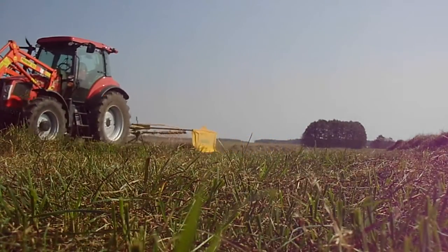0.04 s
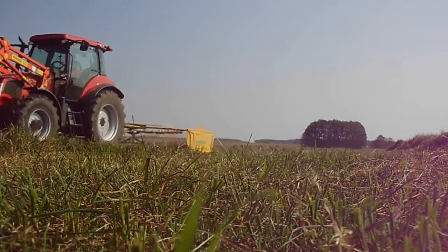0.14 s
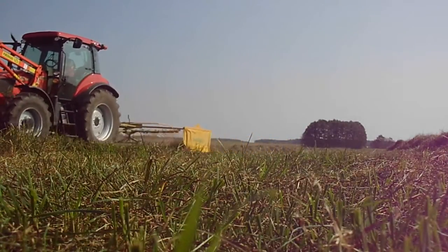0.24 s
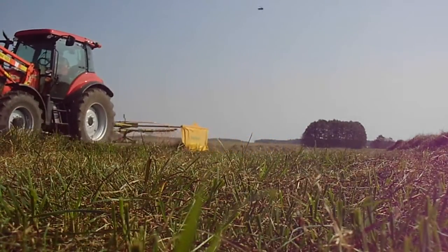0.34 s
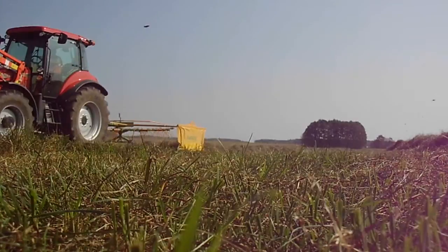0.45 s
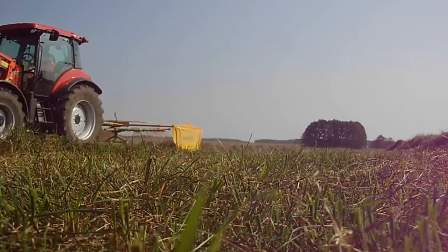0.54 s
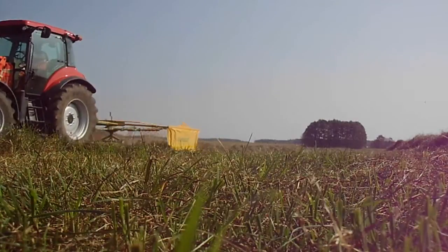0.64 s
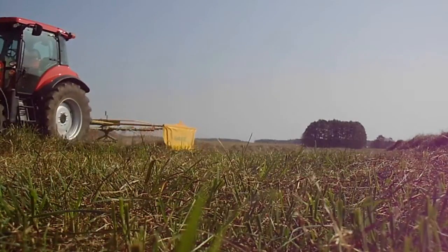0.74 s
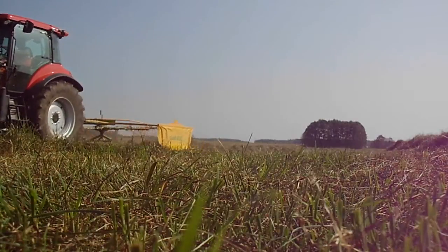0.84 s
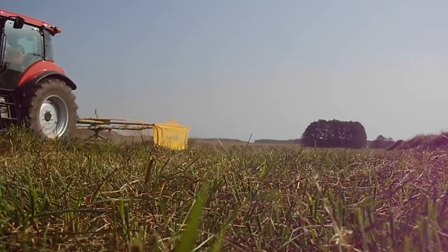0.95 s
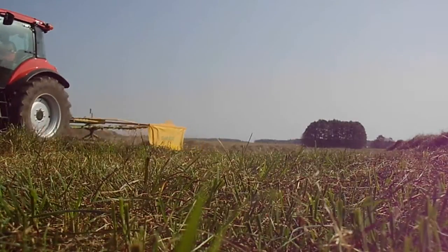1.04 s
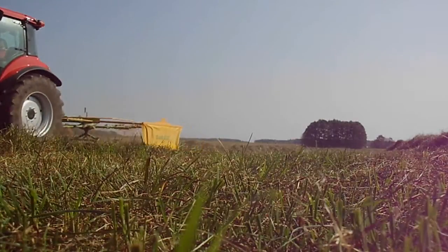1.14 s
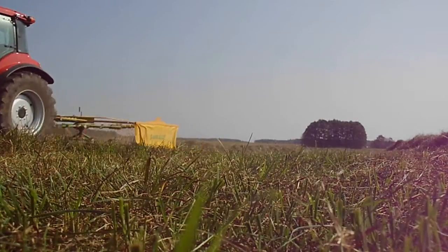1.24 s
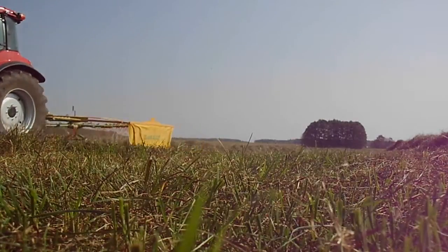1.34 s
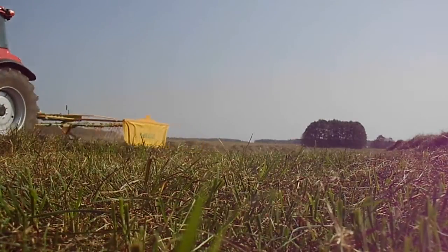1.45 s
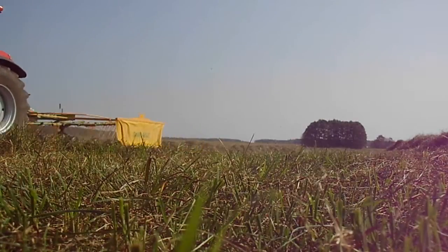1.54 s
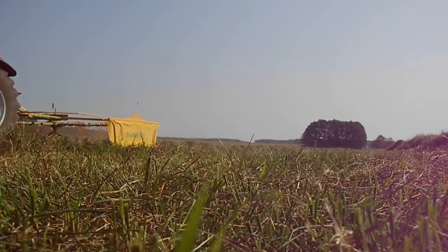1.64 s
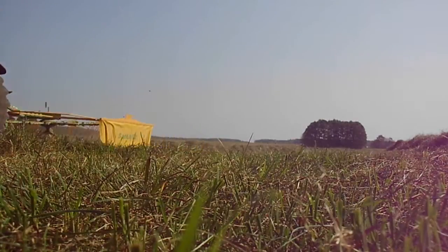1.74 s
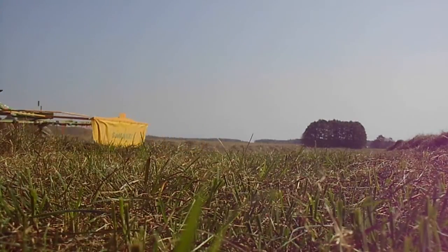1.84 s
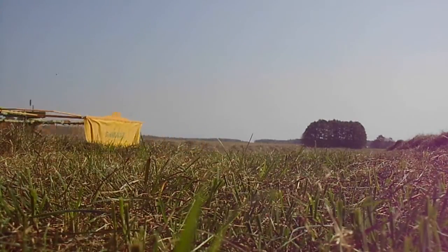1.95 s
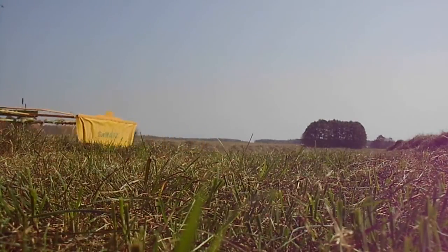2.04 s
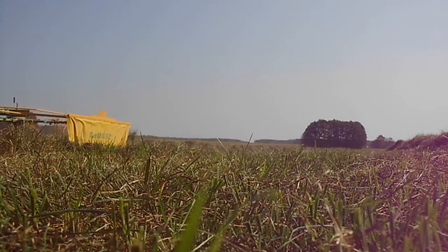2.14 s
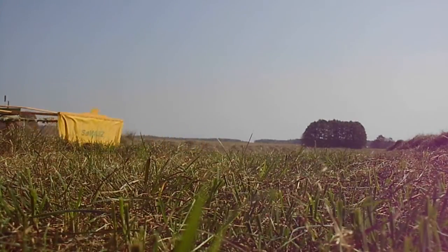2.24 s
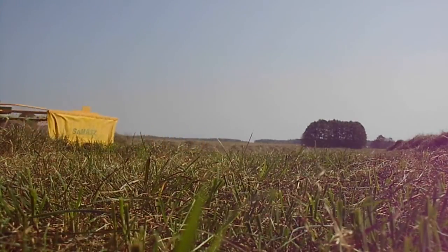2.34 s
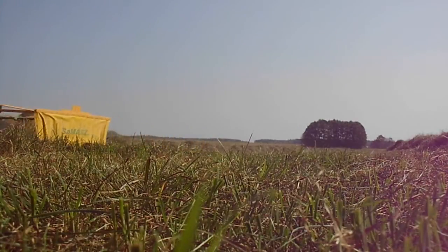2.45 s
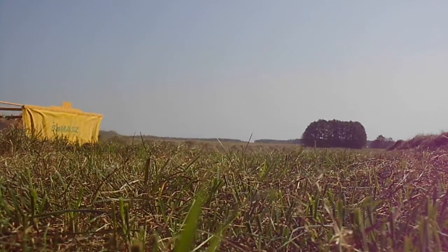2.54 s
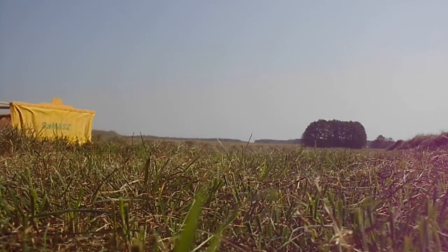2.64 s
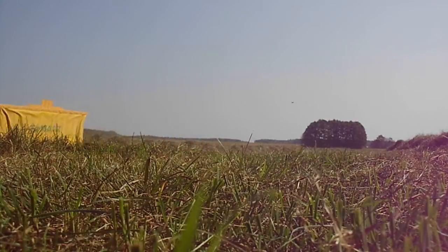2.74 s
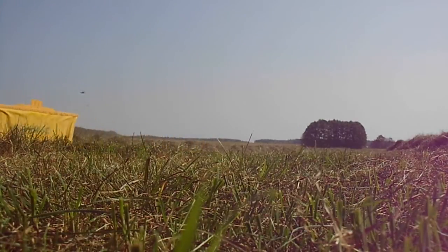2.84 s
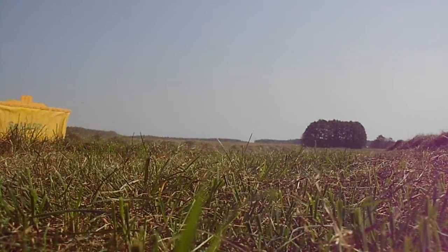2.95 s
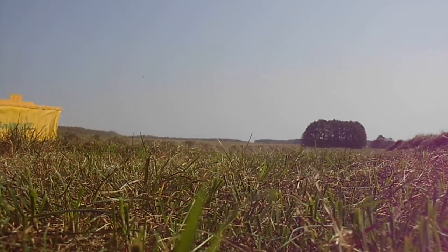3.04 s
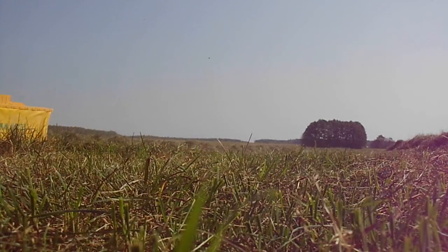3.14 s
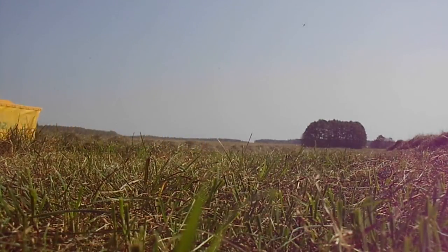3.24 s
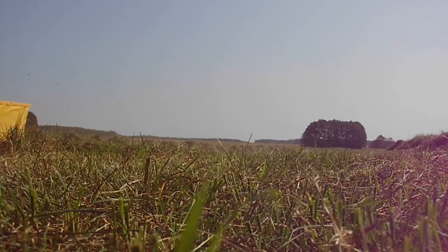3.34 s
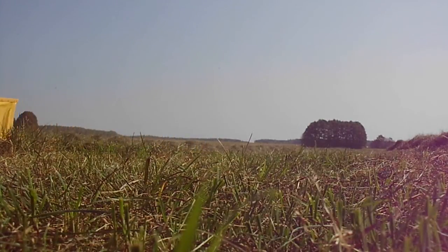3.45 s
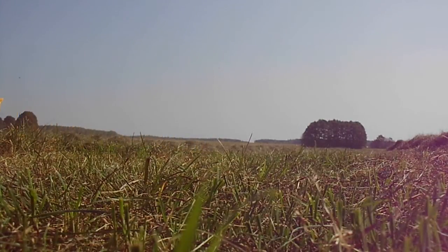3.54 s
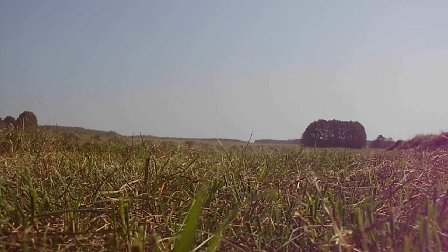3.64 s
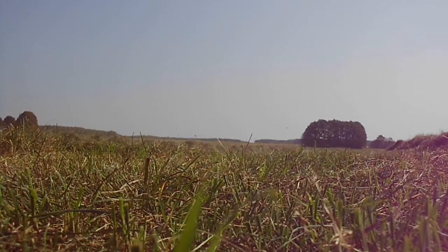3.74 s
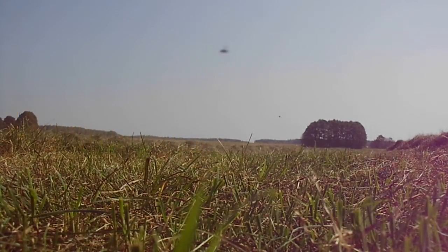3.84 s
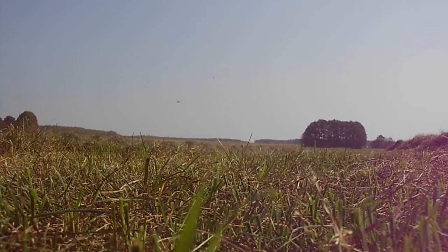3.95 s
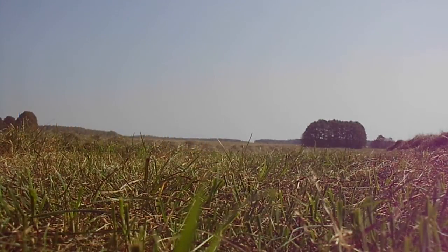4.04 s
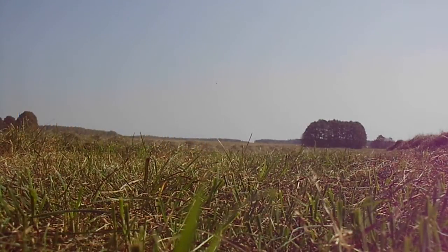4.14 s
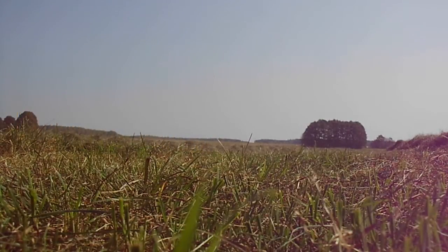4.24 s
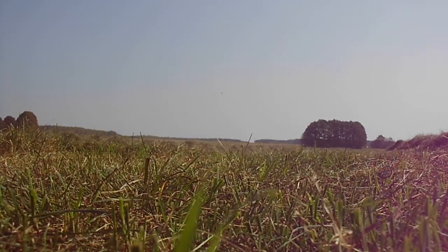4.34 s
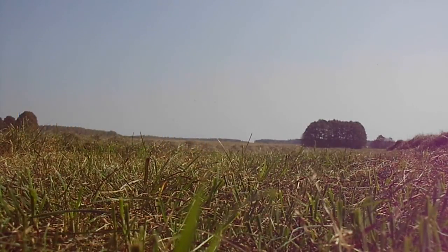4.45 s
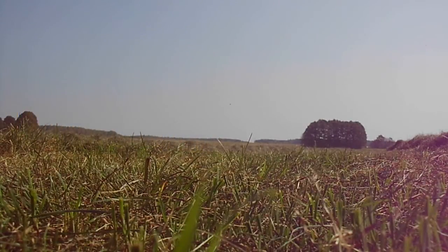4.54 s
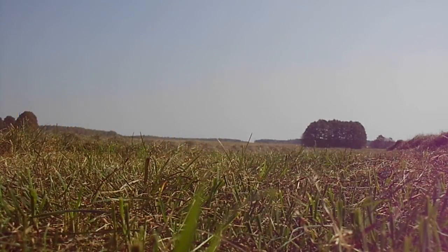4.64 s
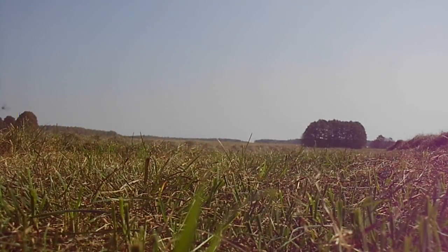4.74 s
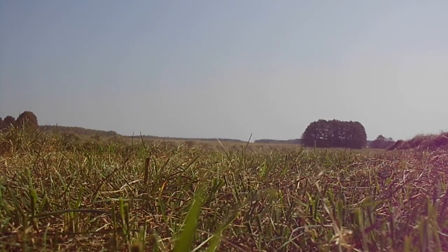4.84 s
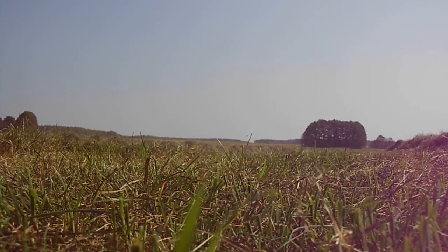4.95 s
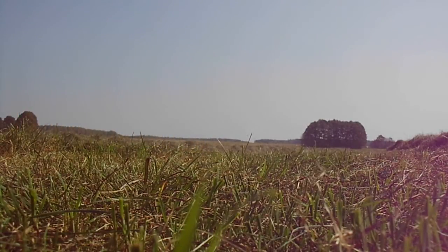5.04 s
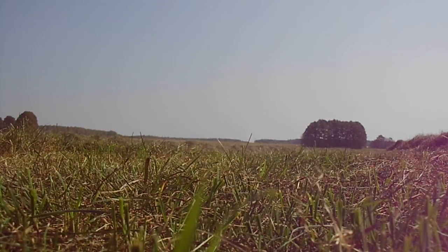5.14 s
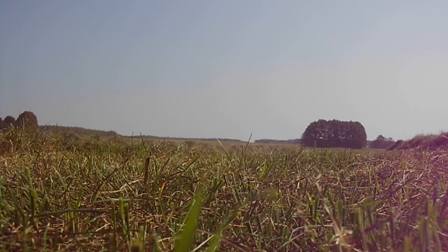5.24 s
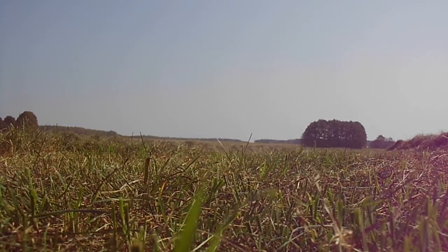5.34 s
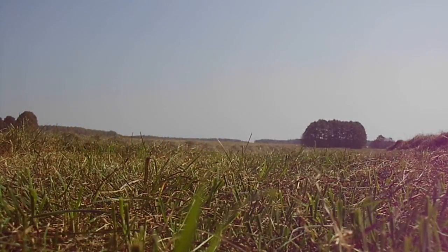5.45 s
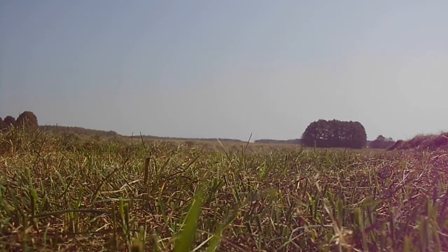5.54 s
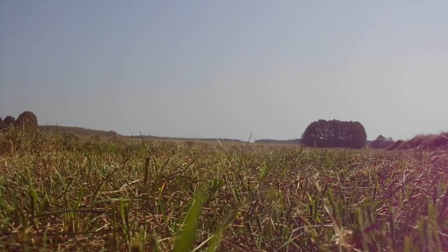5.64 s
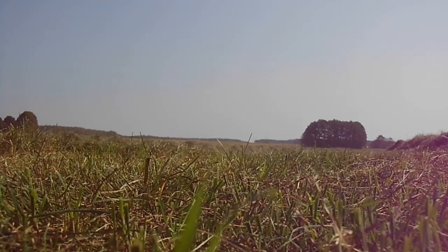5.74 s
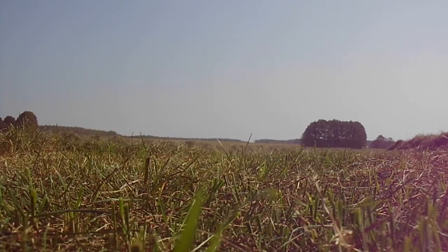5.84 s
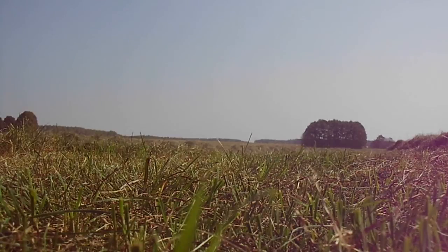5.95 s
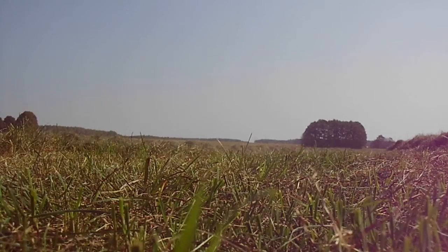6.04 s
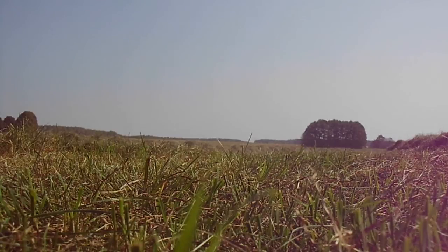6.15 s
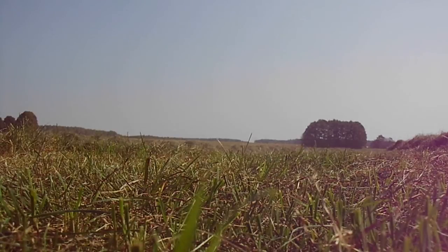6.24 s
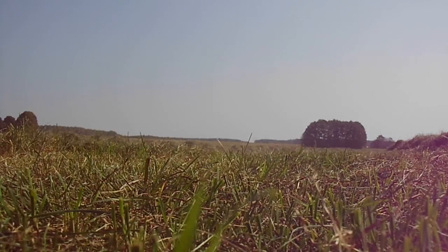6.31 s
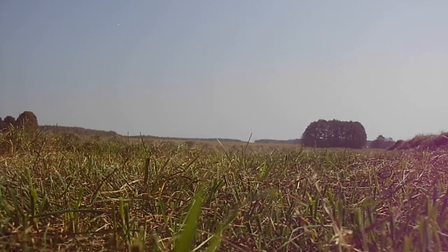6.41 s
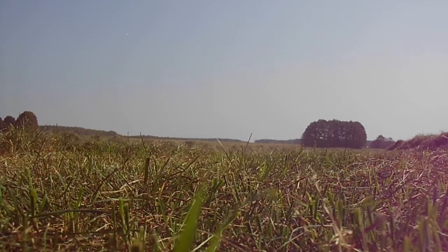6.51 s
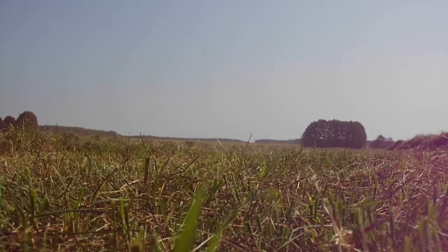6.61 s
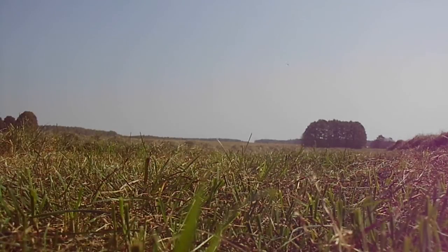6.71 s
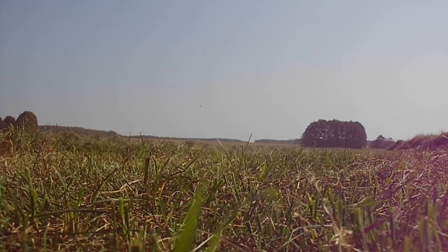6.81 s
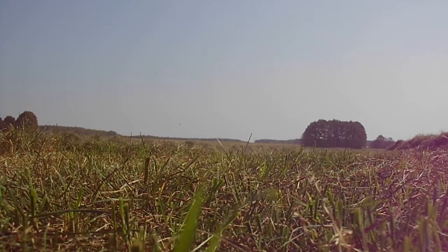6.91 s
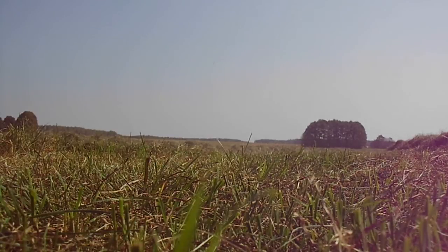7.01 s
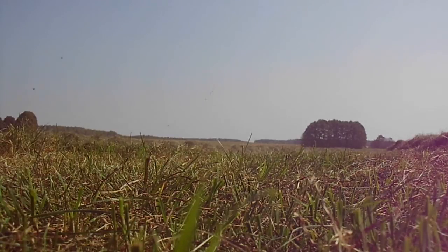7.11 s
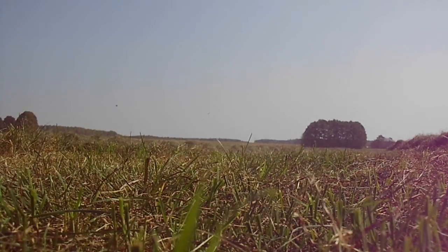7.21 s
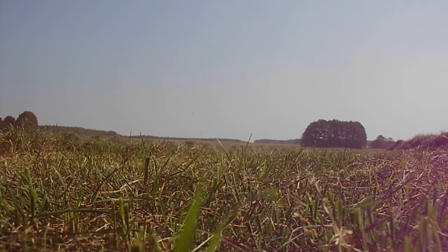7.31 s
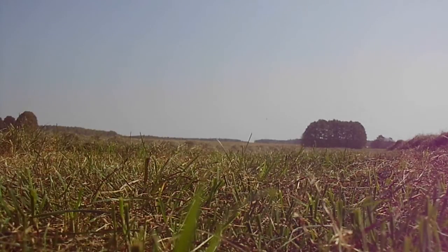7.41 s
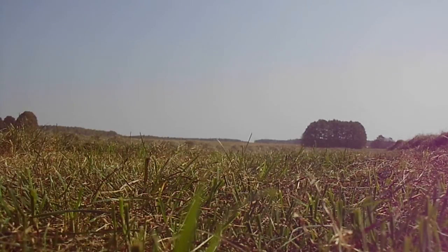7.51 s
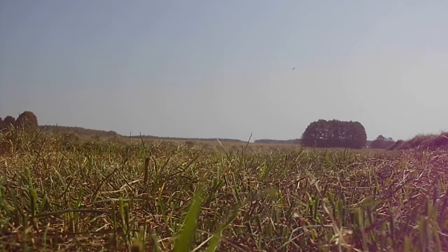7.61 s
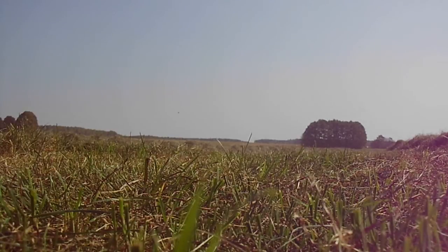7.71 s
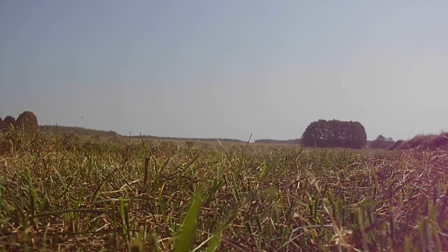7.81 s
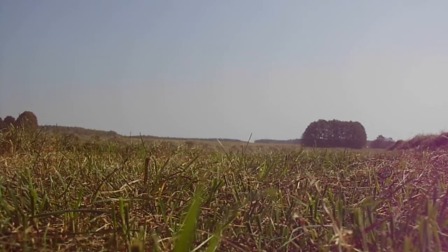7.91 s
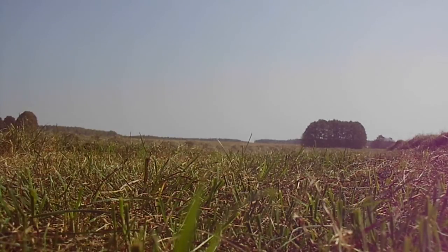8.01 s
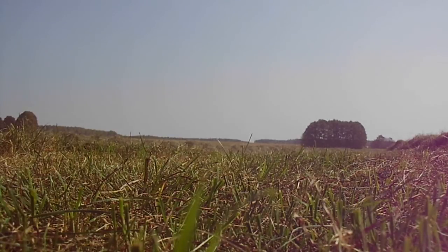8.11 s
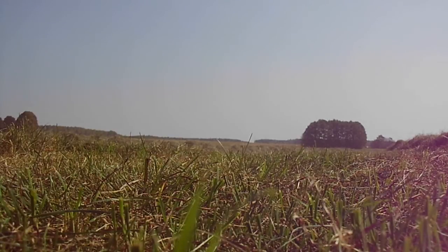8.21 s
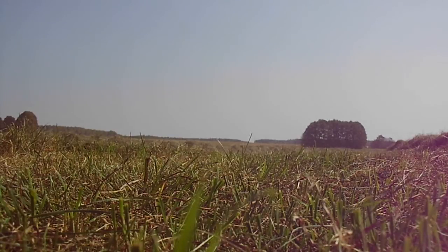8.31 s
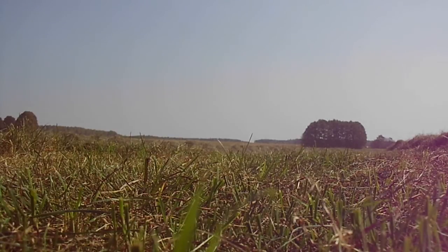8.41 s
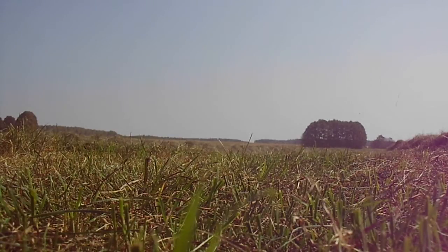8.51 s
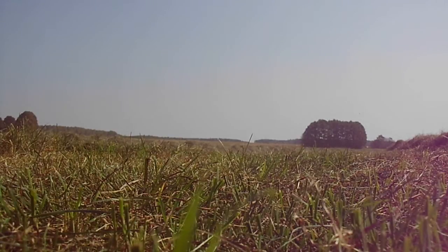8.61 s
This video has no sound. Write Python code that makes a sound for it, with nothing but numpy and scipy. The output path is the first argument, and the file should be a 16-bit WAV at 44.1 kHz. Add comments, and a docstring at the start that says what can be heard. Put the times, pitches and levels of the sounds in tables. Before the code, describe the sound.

A tractor's throbbing, whining engine passes and recedes across a field, its trailing rake combing dry hay, clanking and squeaking.

```python
"""A diesel tractor tows a rotary hay rake past a listener low in the stubble, then draws away.
First the engine: the exhaust throbs, gears whine in step with it and injectors tick, while steel
tines comb the hay. The exhaust booms as the rig turns its back; then loose rake arms clank, dry
joints squeak and the exhaust booms again. Far off, the soft ground notches the fading sound.
Little is heard above 6 kHz, and overload flattens the loudest peaks."""
import sys
import numpy as np
from scipy import signal
from scipy.fft import rfft, irfft
from scipy.io import wavfile

SR = 44100
rng = np.random.default_rng(int(sys.argv[2]) if len(sys.argv) > 2 else 0)


def generate_wav(signal):
    """Clip the signal to [-1, 1] and save it as 16-bit WAV at the path in sys.argv[1]."""
    frames = np.transpose(np.atleast_2d(signal))
    scaled = np.clip(frames, -1, 1) * 32767
    pcm = np.round(scaled).astype(np.int16)
    wavfile.write(sys.argv[1], SR, pcm)


N = 382347
TIME = np.arange(N) / SR
FREQ = np.maximum(np.fft.rfftfreq(N, 1 / SR), 1)
BAND_HZ = 5600  # upper edge of the input's band
# ring of the spring tines and their arms: pitch_hz, width_hz, level_db
TINE_MODES = [(2862, 43, -2), (3170, 53, -6), (3553, 23, -4.5), (4630, 73, 1), (4850, 61, 0)]


def undb(db):
    """Decibels to gain."""
    return 10 ** (np.asarray(db) / 20)


def unit(x):
    """Scale to rms 1."""
    return x / np.sqrt(np.mean(x ** 2))


def automation(points):
    """Join (time_s, value) points into a value per sample."""
    return np.interp(TIME, *np.transpose(points))


def equalise(x, points):
    """Filter by a curve of (frequency_hz, gain_db) points."""
    hz, db = np.transpose(points)
    return irfft(rfft(x) * undb(np.interp(np.log(FREQ), np.log(hz), db)), N)


def colour(x, points):
    """Give a spectrum to x; rms 1."""
    return unit(equalise(x, points))


def ring(x, modes):
    """Drive damped resonances (pitch_hz, width_hz, level_db); rms 1."""
    response = sum(undb(db) / (1 + 1j * (FREQ ** 2 - hz ** 2) / (FREQ * width))
                   for hz, width, db in modes)
    return unit(irfft(rfft(x) * response, N))


def noise():
    """White noise."""
    return rng.standard_normal(N)


def drift(rate_hz):
    """Smooth random wander up to about rate_hz; rms 1."""
    return unit(irfft(rfft(noise()) * np.exp(-(FREQ / rate_hz) ** 2), N))


def pass_by(peak_s, level_db, half_width_s, loss_db_per_s):
    """Gain of a part driving by at steady speed: 1 / distance, and the stubble absorbs on the way."""
    distance = np.hypot(TIME - peak_s, half_width_s)
    return half_width_s / distance * undb(level_db - loss_db_per_s * (distance - half_width_s))


def fader(part):
    """Swell and fade of a named part as it goes by."""
    # each part's pass: peak_s, level_db, half_width_s, loss_db_per_s
    passes = { "throb": (2.5, -21, 3, 1.2), "pipe": (3.5, -20.5, 2.5, 2.8), "hum": (4, -19, 0.33, -1),
              "rumble": (2.5, -14.3, 4, 1.25), "tractor roar": (1.8, -18.5, 2, 1.0),
              "rake roar": (4, -17.5, 1.16, 1.64), "injectors": (0.68, -20.4, 2, 4),
              "hay ahead": (2.0, -21, 0.73, 1.5), "hay behind": (4.0, -22, 1.33, 2),
              "bonnet": (1.24, -21, .17, -0.5), "drive line": (2.5, -32.5, 0.9, 0),
              "fine gear": (1.2, -38, 1.8, 1), }
    return pass_by(*passes[part])


def exhaust(firings):
    """The lowest multiples of the firing rate waver with the load; gas rings pipe and silencer."""
    # two swells of the third harmonic: peak_s, level_db, half_width_s, loss_db_per_s
    booms = [(2.83, -14, 0.32, .8), (4.95, -18, 0.47, -0.3)]
    angle = 2 * np.pi * firings
    throb = fader("throb") * undb(0.24 * drift(4)) * np.sin(angle)
    octave = fader("throb") * undb(-4.5 + 2.4 * drift(15)) * np.sin(2 * angle + 0.15 * drift(6.2))
    swell = np.linalg.norm([pass_by(*row) for row in booms], axis=0)
    boom = swell * undb(0.55 * drift(6)) * np.sin(3 * angle + 0.16 * drift(5.9))
    pipe = fader("pipe") * ring(noise(), [(145.3, 15, 0)])
    hum = fader("hum") * ring(noise(), [(300.4, 7, 0)])
    return np.sqrt(2) * (throb + octave + boom) + pipe + hum


def whine(cycles, flutter_db, flutter_hz, wobble_rad):
    """A vibrating part sings, fluttering in level and phase with its load."""
    flutter = undb(flutter_db * np.tanh(drift(flutter_hz)))
    return unit(flutter * np.sin(2 * np.pi * cycles + wobble_rad * drift(25)))


def gears_and_bonnet(firings):
    """Gear mesh, bonnet, drive line and a fine-toothed gear all sing in step with the engine."""
    # gear whine, strongest while the tractor's front faces the listener: time_s, level_db
    mesh_levels = [(0, -16.5), (.7, -18), (1.2, -22.5), (1.62, -18), (1.85, -26), (2.2, -20.5), (2.42, -26),
                   (3.05, -18), (3.7, -29.5), (4.6, -20), (5, -30.5), (5.4, -27), (6.5, -32.5),
                   (8.67, -44.5)]
    mesh_order, bonnet_order, drive_order, fine_order = 7.93, 5, 54.15, 68  # cycles per firing
    mesh = whine(mesh_order * firings, flutter_db=1.5, flutter_hz=17, wobble_rad=0.17)
    octave = whine(2 * mesh_order * firings, flutter_db=3, flutter_hz=7.4, wobble_rad=0.4)
    bonnet = whine(bonnet_order * firings, flutter_db=0.5, flutter_hz=15, wobble_rad=0.16)
    drive = whine(drive_order * firings, flutter_db=7, flutter_hz=10, wobble_rad=0.75)
    fine = whine(fine_order * firings, flutter_db=8, flutter_hz=9, wobble_rad=1.05)
    gear = undb(automation(mesh_levels)) * (mesh + undb(-19) * octave)
    return gear + fader("bonnet") * bonnet + fader("drive line") * drive + fader("fine gear") * fine


def firing_noise(firings, depth, decay_cycles, scatter_db):
    """Steady noise that surges at each firing, each surge with its own strength."""
    hiss = noise()
    strength = undb(scatter_db * rng.standard_normal(1000))[firings.astype(int)]
    return hiss * (1 + depth * strength * np.exp(-(firings % 1) / decay_cycles))


def rumble_and_roar(firings):
    """Gas puffs rumble and panels drone; fan, tyres and gears roar, the tractor's, then the rake's."""
    # colours of the low rumble and the midrange roar: frequency_hz, gain_db
    rumble_eq = [(15, -18), (40, -16.5), (70, -7.5), (110, -3.5), (140, -2), (180, -0.5), (250, -1),
                 (380, -1.5), (470, -11.5), (700, -29.5)]
    roar_eq = [(280, -31.5), (400, -3.5), (480, -1.5), (640, -2.5), (720, -4), (990, -7), (1130, -13),
               (1300, -19.5), (1500, -21.5), (2500, -32.5)]
    # resonances of silencer and panels, and faint transmission tones: pitch_hz, width_hz, level_db
    panel_modes = [(167, 6.6, -1.5), (207.2, 5.8, 1), (364, 14, -4)]
    transmission_modes = [(649.2, 5.6, 1), (832.7, 10, -6), (972, 5, -5)]
    puffs = firing_noise(firings, depth=0.38, decay_cycles=0.92, scatter_db=4.5)
    rumble = colour(puffs, rumble_eq) + undb(-12) * ring(noise(), panel_modes)
    rush = firing_noise(firings, depth=0.055, decay_cycles=0.71, scatter_db=1.5)
    roar = colour(rush, roar_eq) + undb(-10) * ring(noise(), transmission_modes)
    roar_gain = np.hypot(fader("tractor roar"), fader("rake roar")) * undb(0.32 * drift(14))
    return fader("rumble") * rumble + roar_gain * roar


def injectors(firings):
    """Diesel clatter: a bright burst at each firing."""
    # colour of the ticking: frequency_hz, gain_db
    tick_eq = [(900, -13.5), (1400, -9), (2400, -19.5), (2950, -4.5), (3900, -6.5), (4400, -5), (4800, 1.5),
               (5300, 4.5), (6000, -10.5)]
    bursts = firing_noise(firings, depth=1.6, decay_cycles=0.4, scatter_db=2)
    return fader("injectors") * colour(bursts, tick_eq)


def snaps(per_s, spread_db):
    """Random clicks; spread_db lifts a few well above the rest."""
    clicks = noise() * (rng.random(N) < per_s / SR)
    return clicks * undb(spread_db * np.minimum(rng.exponential(size=N), 5))


def raking():
    """Stalks snap and rustle, tines flick off the ground and ring; the rake's front, then its back."""
    # colour of the dry hay: frequency_hz, gain_db
    hay_eq = [(900, -19.5), (1450, -14), (1900, -3.5), (2400, -3), (3100, 3.5), (3500, 0.5), (3950, 1),
              (4450, 3.5), (4850, 5.5), (5300, 4), (6000, -11.5)]
    hay = colour(snaps(per_s=5000, spread_db=0) + 0.22 * noise(), hay_eq)
    tines = ring(snaps(per_s=220, spread_db=2.1), TINE_MODES)
    rustle = unit((hay + undb(-8) * tines) * undb(0.74 * drift(23)))
    dip_s, dip_width_s, dip_db = 8.09, 0.13, -6  # the rustle dips briefly near the end
    dip = undb(dip_db * np.exp(-((TIME - dip_s) / dip_width_s) ** 2))
    return np.hypot(fader("hay ahead"), fader("hay behind")) * dip * rustle


def drawing_away(rig):
    """The rig turns its back, then draws away, its sound grazing the ground more and more."""
    # colour from behind, and the notches soft ground cuts far off: frequency_hz, gain_db
    rear_eq = [(90, 0.5), (125, 2.5), (180, -1.5), (235, -2), (330, 0.5), (420, -1), (530, 3), (730, -2.5),
               (950, 1), (1300, -1.5), (3700, -.5), (4900, -1)]
    ground_eq = [(150, 2.5), (205, 2.5), (290, 1.5), (380, -3.5), (500, 1.5), (650, -1), (1020, 2),
                 (1220, 0), (1470, -8), (1750, 1.5), (2900, -2.5), (3480, 0), (3900, -2.5), (5500, -3.5)]
    behind = automation([(2.7, 0), (3.8, 1), (5, 1), (6, 0)])
    far = automation([(4.3, 0), (7.2, 1)])
    passed = (1 - behind) * rig + behind * equalise(rig, rear_eq)
    return (1 - far) * passed + far * equalise(passed, ground_eq)


def knocks():
    """Loose arms rattle in their bearings: a scrape, brighter the shorter it is; the tines ring on."""
    # the rake's knocks and ticks: start_s, level_db, decay_s, ring_db (relative to the scrape)
    hits = [(3.765, -18, .029, -16), (3.98, -14.5, .012, -15), (4.385, -18.5, 0.031, -17),
            (5.235, -15, 0.012, -2.5), (5.437, -14, 0.017, -14), (6.063, -17, .04, -2.5),
            (6.072, -25, .02, 7), (6.095, -31, .02, 6), (6.122, -21, 0.0099, -10), (6.168, -26, .028, -5),
            (6.95, -29, .04, -10), (7.195, -26, .01, -10), (7.25, -34, .04, -14.5), (7.43, -31, 0.035, -14),
            (7.618, -25, .008, -11), (7.736, -23.5, 0.0093, -11.5), (8.02, -27, 0.0058, -18.5),
            (8.256, -35, 0.041, -13), (8.415, -31.5, 0.015, -7)]
    attack_s, ring_decay_s = 0.0011, 0.035
    dull_decay_s, tilt_db_per_octave = 0.025, 10.5  # tilt added for each halving of that decay
    out, size = np.zeros(N + SR), 2 ** 14
    scrape = colour(noise(), [(500, -9), (1000, 2.5), (1500, -7.5), (3000, 3.5), (5500, 4.5),
                              (7000, -30)])
    steel = ring(noise(), TINE_MODES)
    octaves = np.log2(np.clip(np.fft.rfftfreq(size, 1 / SR), 1000, BAND_HZ) / BAND_HZ)
    age = np.arange(size) / SR
    attack = 1 - np.exp(-age / attack_s)
    for start_s, level_db, decay_s, ring_db in hits:
        piece = rng.integers(N - size) + np.arange(size)
        tilt = undb(tilt_db_per_octave * np.log2(dull_decay_s / decay_s) * octaves)
        body = unit(irfft(rfft(scrape[piece]) * tilt, size)) * np.exp(-age / decay_s)
        ringing = undb(ring_db) * steel[piece] * np.exp(-age / ring_decay_s)
        at = int(start_s * SR)
        out[at:at + size] += undb(level_db) * (body + ringing) * attack
    return out[:N]


def squeaks():
    """Steel sticks and slips in a dry joint: three rough, unsteady partials that swell and stop."""
    # the rake's dry joints: start_s, length_s, pitch_hz, glide_hz, first_db, second_db, third_db
    slips = [(4.863, 0.041, 1685, 18.5, -31, -19.5, -16.5), (4.883, 0.046, 1685, 19, -32, -28, -11),
             (4.931, 0.041, 1687, 17, -32, -27, -17), (4.975, 0.061, 1605, -3, -50, -50, -21.5),
             (4.998, 0.025, 1726, 20, -32, -27, -43), (5.102, 0.036, 1615, 22, -50, -22, -21),
             (5.115, .045, 1625, 9, -54, -23.5, -42), (5.393, 0.058, 1594, -26, -51, -27, -30.5),
             (6.82, 0.021, 1577, 12, -58, -32, -49), (7.359, 0.014, 1673, 33, -58, -33, -42),
             (8.511, 0.022, 1580, 93.5, -53.5, -31, -51)]
    out = np.zeros(N)
    wobble_hz = 32 * drift(740)
    rasp = unit(undb(1.4 * drift(260)))
    for start_s, length_s, pitch_hz, glide_hz, *partials_db in slips:
        span = (TIME >= start_s) & (TIME < start_s + length_s)
        progress = (TIME[span] - start_s) / length_s
        angle = 2 * np.pi * np.cumsum(pitch_hz + glide_hz * progress + wobble_hz[span]) / SR
        tone = sum(undb(db) * np.sin(k * angle) for k, db in enumerate(partials_db, 1))
        swell = np.sqrt(2 * np.abs(np.sin(np.pi * progress)))
        out[span] += swell * rasp[span] * tone
    return out


def scene():
    """The engine bay faces the listener first; then the rake takes over and both recede."""
    # engine speed, sagging and recovering with the load: time_s, firing_rate_hz
    engine_speed = [(0, 53.1), (.5, 52.38), (.75, 52.56), (1.2, 51.86), (1.6, 53.33), (1.8, 52.18),
                    (2.25, 53.32), (2.5, 52.3), (2.75, 52.4), (3.1, 51.72), (3.3, 52.3), (3.7, 51.87),
                    (4, 52.57), (4.3, 52.23), (4.6, 53.1), (5, 52.05), (6, 52.34), (8.67, 52.27)]
    firings = np.cumsum(automation(engine_speed)) / SR  # running count
    machinery = exhaust(firings) + gears_and_bonnet(firings) + rumble_and_roar(firings)
    rig = machinery + injectors(firings) + raking()
    return (drawing_away(rig) + squeaks() + knocks())[None]


def record(dry):
    """A narrow-band input overloads, flattening the tallest peaks into faint ticks with a soft top."""
    ceiling, hardness, top_hz = 0.72, 22, 15800
    low_pass = signal.firwin(221, BAND_HZ, window=("kaiser", 7), fs=SR)
    narrow = signal.fftconvolve(dry[0], low_pass, "same")
    flattened = narrow / (1 + np.abs(narrow / ceiling) ** hardness) ** (1 / hardness)
    soft = equalise(flattened, [(6000, 0), (7800, -5), (10500, -2), (15000, 0)])
    top_cut = signal.ellip(8, 0.2, 70, top_hz, fs=SR, output="sos")
    return signal.sosfilt(top_cut, soft)[None]


dry = scene()
out = record(dry)
generate_wav(out)
```